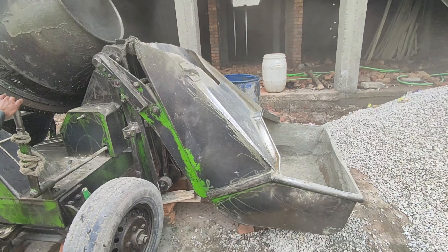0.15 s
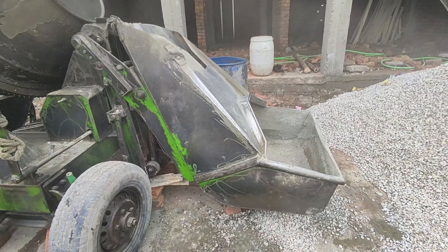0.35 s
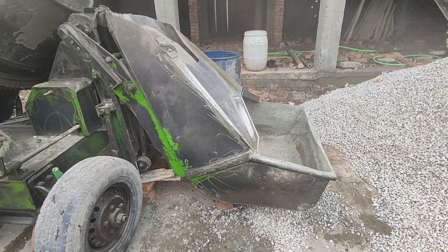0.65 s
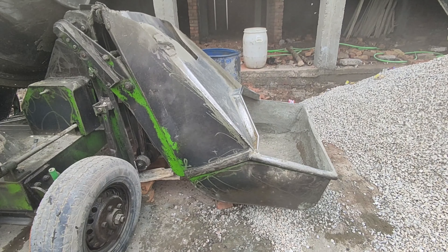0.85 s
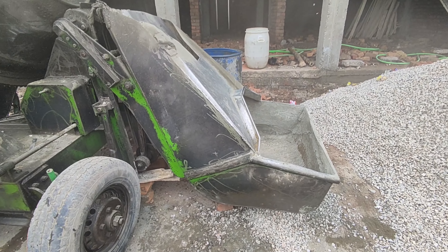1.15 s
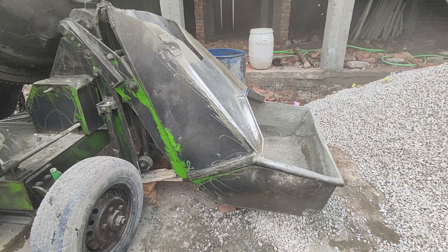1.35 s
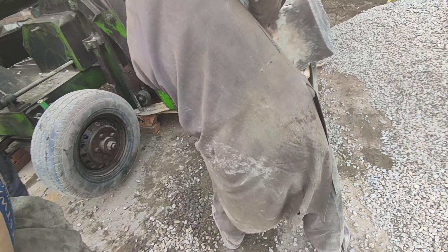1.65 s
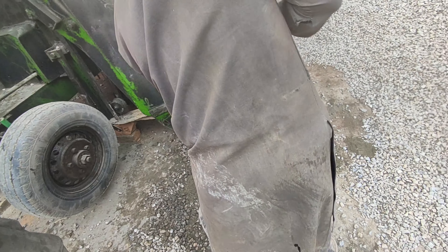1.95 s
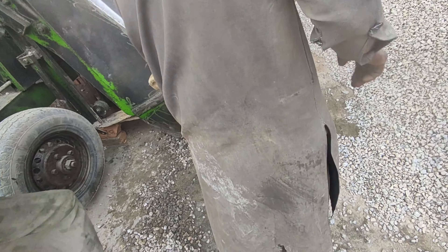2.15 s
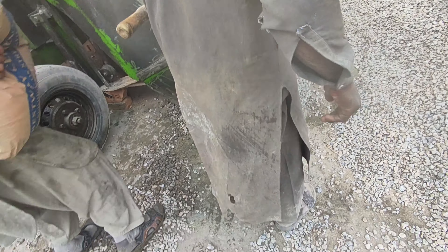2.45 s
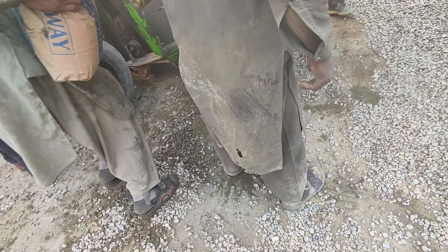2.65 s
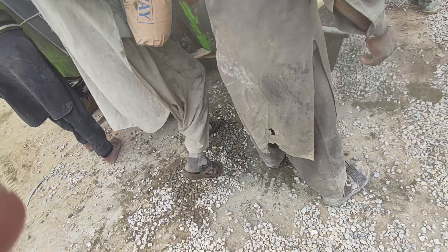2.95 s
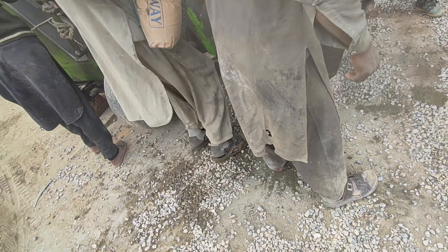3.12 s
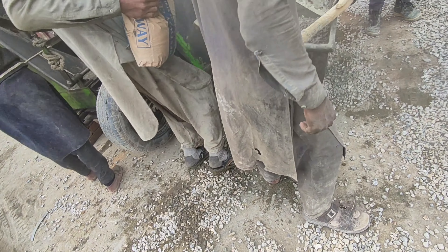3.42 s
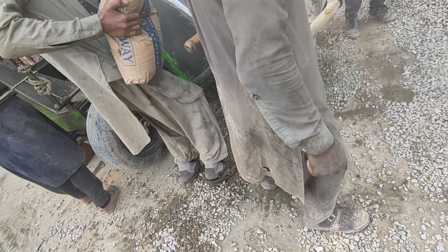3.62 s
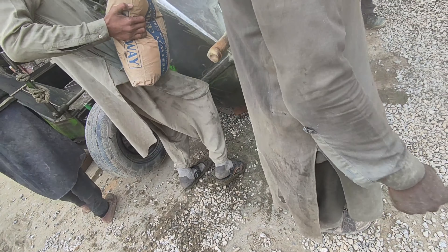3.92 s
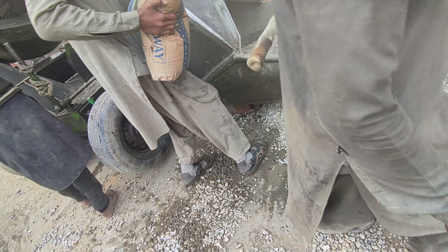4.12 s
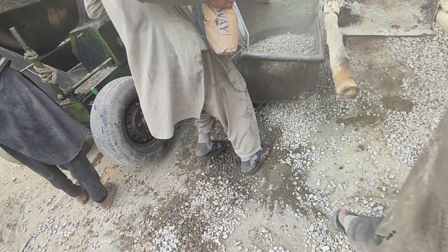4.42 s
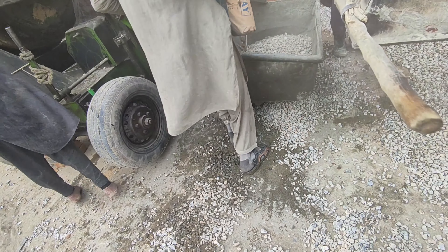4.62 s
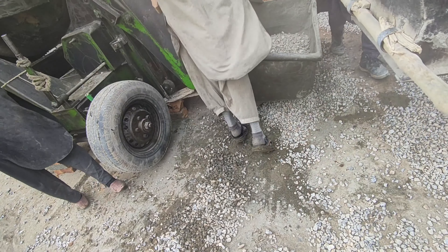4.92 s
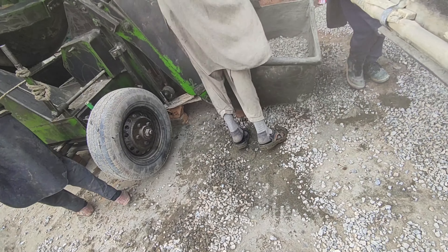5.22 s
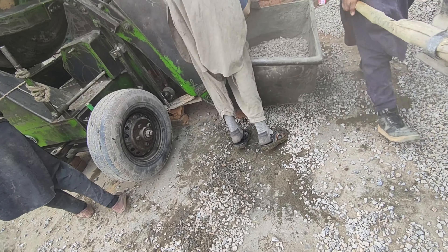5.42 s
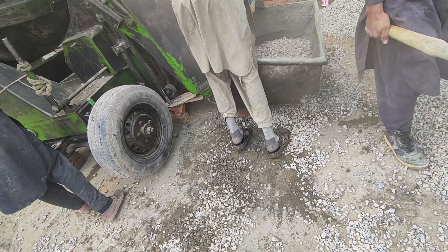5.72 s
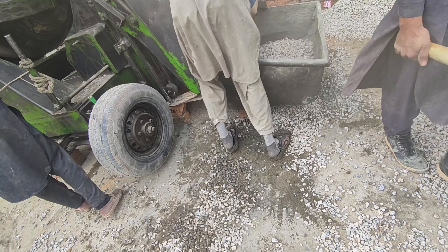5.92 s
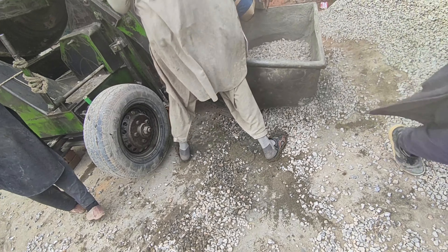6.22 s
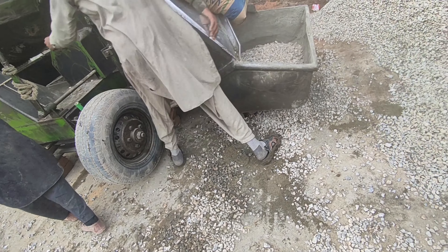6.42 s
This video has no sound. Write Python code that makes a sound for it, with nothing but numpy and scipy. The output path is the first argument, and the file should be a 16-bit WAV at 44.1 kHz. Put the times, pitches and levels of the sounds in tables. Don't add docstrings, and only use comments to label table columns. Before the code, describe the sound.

Steady chugging engine and clattering mixer drum, a short silent gap, a loud clanging sheet-metal slam, then more chugging with rushes of tumbling gravel.

```python
import sys
import numpy as np
from scipy import signal
from scipy.fft import rfft, irfft, next_fast_len
from scipy.io import wavfile
from scipy.ndimage import uniform_filter1d

SR = 44100
rng = np.random.default_rng(int(sys.argv[2]) if len(sys.argv) > 2 else 0)


def nominal_scale(level):
    x = np.asarray(level, float) / 20
    return 10 ** x


def transcribe(signal):
    frames = np.atleast_2d(signal).T
    limited = np.clip(frames, -1, 1)
    pcm = np.round(limited * 32767).astype(np.int16)
    wavfile.write(sys.argv[1], SR, pcm)


N = 289737
T_S = np.arange(N) / SR
FFT_SIZE = next_fast_len(N)
FFT_HZ = np.fft.rfftfreq(FFT_SIZE, 1 / SR)
CUT_S = (1.519, 1.8365)

# time_s, cycles
CRANK = [(0.0, -0.071), (1.5, 13.082), (1.8, 15.288), (2.547, 21.936), (3.441, 29.976), (4.335, 38.001),
         (4.782, 41.989), (6.57, 57.66)]
CYCLES = np.interp(T_S, *np.transpose(CRANK))
FIRINGS = 58
# time_s, level_db
EFFORT = [(0, -1), (.45, 0.5), (1.3, 0), (1.5, -0.5), (2.3, 0), (2.55, 0), (2.85, 1.5), (3.3, 0),
          (3.7, 0.5), (4.1, 0), (4.8, 0), (5.4, -0.5), (6.1, -0.5), (6.57, -1.5)]
# pitch_hz, width_hz, level_db, delay_cycles
PIPE = [(70, 18, -14, -.05), (115, 15, -3, -.11), (176, 30, -3.5, .04), (298, 28, -3, -.12),
        (272, 28, -3, .09), (380, 55, -9, -.08), (432, 50, -9, .12)]
# pitch_hz, density_db_per_hz
RUMBLE = [(21, -61.5), (35, -31.5), (54, -49), (76, -41.5), (96, -4), (112, 1), (145, -5.5), (167, -2.5),
          (237, -1.5), (298, 3), (454, -9.5), (550, -18.5), (620, -21.5), (810, -48), (1360, -120)]
# time_s, swing_db
THROB = [(0, .2), (2.2, .8), (4.6, 1.2), (5.3, 2.2), (6.57, 2.4)]
# pitch_hz, width_hz, level_db
BLOCK = [(813, 190, -1), (1100, 74, -5.5), (1437, 290, 1.5), (1845, 110, 0.5), (2210, 240, 2.5),
         (2405, 63, -6)]
# pitch_hz, density_db_per_hz
CLATTER = [
    [(280, -42.5), (480, -2.5), (547, -8), (594, -2), (852, -1.5), (1010, -4), (1470, -4.5), (1600, -5.5),
     (2030, -4), (3400, -14), (4420, -44), (7480, -120)],
    [(280, -28.5), (480, -5.5), (824, -10), (924, -11.5), (1260, -7.5), (1440, -12.5), (1670, -5.5),
     (2470, -14.5), (2790, -16.5), (3400, -20), (4420, -56), (7480, -120)],
    [(280, -19.5), (480, 0.5), (575, -6), (735, -5.5), (1200, -10), (1450, -6.5), (2180, -9), (2730, -15),
     (2960, -23.5), (3400, -37.5), (4420, -54.5), (7480, -120)],
    [(280, -33.5), (480, -0.5), (589, -5), (683, -1), (979, -1.5), (1150, 0), (1680, -4), (2220, -5),
     (2700, -19), (3400, -20), (4420, -34.5), (7480, -120)],
]
CLATTER_AT_S = [1.6, 2.6, 3.3, 4.3, 4.8]
# pitch_hz, density_db_per_hz
STONES = [
    [(2400, -20.5), (3100, -2), (3500, -0.5), (4230, -10.5), (4870, -14.5), (5190, -13), (6580, -9),
     (6880, -14.5), (7050, -22), (8300, -25), (9200, -39.5)],
    [(2400, -20.5), (3100, -1.5), (3540, -4), (3950, 0.6), (4400, -3), (4800, -8.5), (6600, -6),
     (6880, -8.5), (7050, -13), (8300, -23.5), (9200, -43)],
    [(2400, -10), (3100, 0), (3540, -6), (4010, -5.5), (4970, -8.5), (6560, -10), (6880, -11), (7000, -17),
     (8000, -38.5)],
]
STONES_AT_S = [0.372, .42, 1.6, 2.3]
# pitch_hz, density_db_per_hz
DUST = [(6000, -33), (6950, -24.5), (7600, -8), (8900, -7), (11550, -2), (11700, 2.7), (13700, 0),
        (14500, -5)]
# onset_s, level_db, fade_s
HEAPS = [(2.4383, -29, 0.065), (2.6761, -34, 0.037), (2.8297, -31, 0.038), (3.0462, -28.5, 0.057),
         (3.1914, -27, 0.038), (3.266, -25.5, 0.032), (3.379, -32, 0.021), (3.4598, -30, 0.046),
         (3.615, -33, 0.044), (3.7911, -28.5, 0.083), (4.2884, -29, 0.054), (4.456, -31, 0.05),
         (4.5678, -29, 0.063), (4.709, -24, 0.045), (4.8965, -29.5, 0.065), (5.0846, -25.5, 0.06),
         (5.2343, -27.5, 0.075), (5.3298, -21, 0.043), (5.5131, -32, 0.065), (5.6982, -24.5, 0.045),
         (5.7925, -30, 0.034), (5.8643, -31, 0.05), (6.0539, -25.5, 0.038), (6.169, -26, 0.061),
         (6.4291, -32.5, 0.05), (6.5383, -33.5, 0.04)]
# pitch_hz, level_db, t60_s
HOPPER = [(170, -3, 0.23), (221, -4.5, .16), (258, -3, 0.075), (309, 1.5, .16), (372, 2, 0.11),
          (446.5, -2, 0.09), (765, -7.5, 0.091), (1054, -13, 0.059), (1380, -8, .07), (3130, -24, .04),
          (3620, -26, .04)]
# start_s, level_db, brightness_db_per_octave
SLAMS = [
    (1.8884, -5, 1.5),
    (1.899, -3, -1.5),
    (1.921, -4, -1),
    (1.943, -3.5, -2.5),
    (1.962, -8, -3.5),
    (1.983, -10.5, -7.5),
    (2.045, -11.5, -7),
]
# pitch_hz, density_db_per_hz
GROUND = [(20, -10.5), (30, -6.5), (45, -8.5), (65, -2.5), (90, 2.5), (130, -26), (300, -90.5)]
# time_s, loss_db
SCREEN = [(0, 1), (1.5, -0.5), (1.84, -1.5), (2.17, -0.5), (2.39, 8.5), (2.75, 9.5), (3.1, 10.5), (3.3, 9),
          (4.1, 7.5), (4.37, 6), (4.75, 9), (5.0, 5), (5.36, 6.5), (5.5, 7.5), (5.9, 7.5), (6.1, 7),
          (6.35, 11.5), (6.57, 5.5)]
# pitch_hz, likeness_0_to_1
SAME = [(60, 0.94), (340, 0.98), (520, 0.86), (690, 0.78), (860, 0.57), (1200, 0.32), (2500, 0.22),
        (4500, 0.026)]
# pitch_hz, lead_rad
LEAD = [(100, 0.055), (340, 0.28), (520, 0.79), (690, 0.7), (860, 1.55), (1200, 3.5), (2000, 4.74),
        (3000, 8.4)]
# pitch_hz, left_minus_right_db
FACING = [(100, 1), (500, -0.5), (1500, 2), (2600, 1.5), (3300, -6.5), (4200, -10.5), (5500, -6.5),
          (7500, -5.5), (9000, 4), (11000, 8), (14500, 6.5)]
# pitch_hz, left_minus_right_db
TURNED = [(100, 1.7), (800, -1), (2200, -2.5), (3600, 1), (5800, -5), (7200, -3), (8500, 11), (9800, 24),
          (11200, 22), (12300, 15), (14500, 25.5)]
# time_s, turn_0_facing_1_turned
TURN = [
    (.7, -0.26),
    (1.1, .1),
    (1.9, .05),
    (2.3, 1.23),
    (6.57, 1.16),
]

EXHAUST_OVER_DRUM_DB = (-6.5, -3.5)
BASS_DB, RUMBLE_DB, CLATTER_DB = (-26, -27.5), (-17, -14.5), (-20, -21)
STONES_DB, DUST_DB, GROUND_DB = (-27, -28), (-37.5, -35.5), (-36.5, -41)
BASS_SHARE, CLATTER_SHARE, GROUND_SHARE = -0.3, 0.16, 0.45
STONES_SHARE, DUST_SHARE = 0.8, 1.14
BASS_PULL, CLATTER_PULL = 0.4, 0.4
WANDER_DB, WANDER_HZ = 0.6, 2.0
DUCK_S, DUCK_DB = (1.84, 2.118, 2.173), (-13, -3.5, -8)
RETURN_DB, RETURN_S = 4, 0.025
HEAP_RISE_S = 0.018
SETTLE_S, SETTLE_DB = (1.995, 2.005), -10
DRONE_S, DRONE_HZ, DRONE_DB = (2.3, 2.65, 3.1), (600, 222), -21


def machine():
    bass_db, rumble_db, clatter_db = machine_levels()
    low = evened(drum() + nominal_scale(steady(EXHAUST_OVER_DRUM_DB)) * exhaust())
    below_140_hz = signal.butter(3, 140, fs=SR, output="sos")
    bass = signal.sosfiltfilt(below_140_hz, low)
    rumble = low - bass
    low = nominal_scale(bass_db) * evened(bass) + nominal_scale(rumble_db - 0.68) * evened(rumble)
    high = evened(gears() + nominal_scale(-6) * evened(piston_knock()))
    return low + nominal_scale(clatter_db + 3.5) * high


def exhaust():
    out, fired = np.zeros(N), np.arange(FIRINGS)
    time_s, cycles = np.transpose(CRANK)
    late, size = rng.standard_normal((FIRINGS, 2)).T
    for hz, width_hz, db, delay_cycles in PIPE:
        jitter = late + 0.5 * rng.standard_normal(FIRINGS)
        at_s = np.interp(fired + delay_cycles, cycles, time_s) + 0.00035 * jitter
        push = np.zeros(N)
        push[np.clip((at_s * SR).astype(int), 0, N - 1)] = nominal_scale(0.9 * (size + rng.standard_normal(FIRINGS)))
        tone = ring(ring(push, hz, width_hz), hz, 1.6 * width_hz)
        out += nominal_scale(db) * evened(tone)
    return evened(out)


def drum():
    rumble = shaped(noise(patchy_db=0.87), [RUMBLE], [0])
    rumble = rumble * puffs(0.99, at=-0.029, decay=0.7, depth=0.74, uneven_db=0.0)
    rumble = rumble * showers(45, 0.024, spread_db=5.5, depth=0.067)
    swing_db = curve(THROB)
    return rumble * nominal_scale(swing_db * np.cos(2 * np.pi * (CYCLES - 0.1)))


def gears():
    spectra = [CLATTER[k] for k in (0, 1, 2, 2, 3)]
    clatter = shaped(noise(patchy_db=1.4), spectra, CLATTER_AT_S)
    clatter = clatter * puffs(1, at=-0.08, decay=0.35, depth=0.75, uneven_db=1.8)
    return clatter * showers(300, 0.004, spread_db=2.5, depth=0.12)


def piston_knock():
    slap = rng.standard_normal((2, N)) * puffs(2, at=-0.085, decay=0.3, depth=5, uneven_db=1.5)
    out = 0
    for hz, width_hz, db in BLOCK:
        out = out + nominal_scale(db) * evened(ring(ring(slap, hz, width_hz), hz, 3 * width_hz))
    return out


def machine_levels():
    wander = 0
    for ratio in np.geomspace(0.1, 1, 12):
        wander = wander + np.sin(2 * np.pi * (ratio * WANDER_HZ * T_S + rng.random()))
    pull_db = curve(EFFORT)
    bass_db = steady(BASS_DB, BASS_SHARE) + WANDER_DB * evened(wander) + BASS_PULL * pull_db
    rumble_db = steady(RUMBLE_DB) + pull_db
    clatter_db = steady(CLATTER_DB, CLATTER_SHARE) + CLATTER_PULL * pull_db
    duck = np.interp(T_S, DUCK_S, [0, 1, 0])
    back_db = RETURN_DB * np.exp(-abs(T_S - CUT_S[1]) / RETURN_S)
    levels_db = (bass_db, rumble_db, clatter_db)
    return [db + back_db + depth_db * duck for db, depth_db in zip(levels_db, DUCK_DB)]


def hopper():
    out, t = np.zeros((2, N)), T_S[:SR // 2]
    for start_s, blow_db, bright_db in SLAMS:
        boom = 0
        for hz, db, t60_s in HOPPER:
            fade_db = db + bright_db * np.log2(hz / 300) - 60 * t / t60_s
            boom = boom + nominal_scale(fade_db) * np.sin(2 * np.pi * (hz * t + rng.random()))
        damping_db = SETTLE_DB if start_s < SETTLE_S[0] else 0
        boom = boom * nominal_scale(np.interp(t + start_s, SETTLE_S, [0, damping_db]))
        crack = nominal_scale(-1 + 2.8 * bright_db - 60 * t / 0.11) * rng.standard_normal((2, len(t)))
        crack = signal.lfilter([0.3], [1, -0.84], crack)
        blow = boom * np.minimum(t / 0.002, 1) + crack
        out[:, round(start_s * SR):][:, :len(t)] += nominal_scale(blow_db) * blow
    return out


def gravel():
    heaps = 0
    for onset_s, db, fade_s in HEAPS:
        rise = np.clip((T_S - onset_s) / HEAP_RISE_S, 0, 1)
        heaps = heaps + nominal_scale(db) * rise * np.exp(-abs(T_S - onset_s) / fade_s)
    hiss = noise(patchy_db=1.64)
    spectra = [STONES[k] for k in (0, 1, 1, 2)]
    stones_gain = nominal_scale(steady(STONES_DB, STONES_SHARE) + 2.5) + nominal_scale(-6.0) * heaps
    dust_gain = nominal_scale(steady(DUST_DB, DUST_SHARE) + 4.0) + nominal_scale(-9.5) * heaps
    stones = stones_gain * shaped(hiss, spectra, STONES_AT_S)
    dust = dust_gain * shaped(hiss, [DUST], [0])
    return (stones + dust) * showers(69, 0.015, spread_db=3.0, depth=0.24)


def surroundings():
    hiss = noise(patchy_db=0.5)
    ground = nominal_scale(steady(GROUND_DB, GROUND_SHARE)) * shaped(hiss, [GROUND], [0])
    drone = evened(ring(ring(hiss, *DRONE_HZ), *DRONE_HZ))
    drone = drone * puffs(0.93, at=-0.08, decay=0.6, depth=0.6, uneven_db=0.5)
    return ground + nominal_scale(DRONE_DB) * np.interp(T_S, DRONE_S, [0, 1, 0]) * drone


def puffs(per_cycle, at, decay, depth, uneven_db):
    stroke = (CYCLES - at) * per_cycle + 9
    strength = nominal_scale(uneven_db * rng.standard_normal(200)[stroke.astype(int)])
    pulse = strength * np.exp(-(stroke % 1) / decay)
    return evened(1 + depth * uniform_filter1d(pulse, size=250))


def showers(per_s, decay_s, spread_db, depth):
    struck = rng.random(N) < per_s / SR
    size = nominal_scale(spread_db * np.minimum(rng.exponential(1, N), 4)) * struck
    fall = np.exp(-1 / (decay_s * SR))
    return evened(1 + depth * evened(signal.lfilter([1], [1, -fall], size)))


def ring(x, hz, width_hz):
    r = np.exp(-np.pi * width_hz / SR)
    return signal.lfilter([1, 0, -1], [1, -2 * r * np.cos(2 * np.pi * hz / SR), r * r], x)


def noise(patchy_db):
    frames, hz = N // 256 + 5, np.fft.rfftfreq(1024, 1 / SR)
    a, b, c, d, patches = rng.standard_normal((5, frames, 513)).transpose(0, 2, 1)
    patches = uniform_filter1d(patches, size=8, axis=0)
    patches = evened(uniform_filter1d(patches, size=12, axis=1))
    same = np.clip(read(SAME, hz), 0, 1)[:, None]
    lag = np.exp(-1j * read(LEAD, hz))[:, None]
    left = a + 1j * b
    right = same * lag * left + np.sqrt(1 - same ** 2) * (c + 1j * d)
    spectrum = np.array([left, right]) * nominal_scale(patchy_db * patches)
    return signal.istft(spectrum, nperseg=1024, noverlap=768)[1][:, :N]


def shaped(x, spectra, times_s):
    out = 0
    for share, points in zip(np.eye(len(times_s)), spectra):
        out = out + np.interp(T_S, times_s, share) * evened(coloured(x, read(points, FFT_HZ)))
    return out


def coloured(x, gain_db):
    return irfft(rfft(x, FFT_SIZE) * nominal_scale(gain_db), FFT_SIZE)[..., :N]


def steady(levels_db, share=0):
    return np.where(T_S < CUT_S[0] + 0.1, *levels_db) - share * curve(SCREEN)


def curve(table):
    return np.interp(T_S, *np.transpose(table))


def read(points, hz):
    f, value = np.transpose(points)
    return np.interp(np.log(hz + 1), np.log(f + 1), value)


def evened(x):
    return x / np.sqrt(np.mean(x ** 2) + 1e-20)


def ports(x):
    views = []
    for table in (FACING, TURNED):
        tilt_db = np.outer([1, -1], read(table, FFT_HZ))
        views.append(coloured(x, 10 * np.log10(2 / (1 + nominal_scale(-2 * tilt_db)))))
    facing, turned = views
    return facing + curve(TURN) * (turned - facing)


def scene():
    return machine() + hopper() + gravel() + surroundings()


def low_pass(x):
    return signal.sosfilt(signal.butter(12, 15450, fs=SR, output="sos"), x)


def record(dry):
    ceiling = nominal_scale(-2)
    heard = ports(dry)
    limited = heard / (1 + (abs(heard) / ceiling) ** 6) ** (1 / 6)
    edge_db = np.interp(FFT_HZ, [20, 60, 14230, 14350], [-9, 0, 0, -70])
    before = np.clip((CUT_S[0] - T_S) / 0.0027 + 1, 0, 1)
    after = np.clip((T_S - CUT_S[1]) / 0.0008, 0, 1)
    return low_pass(coloured(limited, edge_db) * (before + after))


dry = scene()
out = record(dry)
transcribe(out)
```